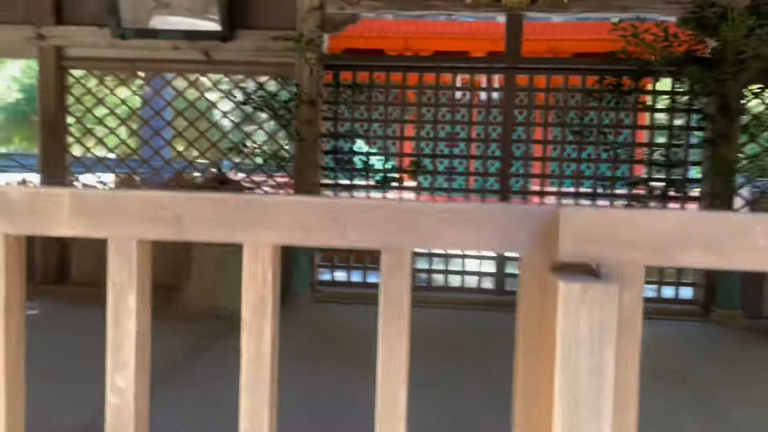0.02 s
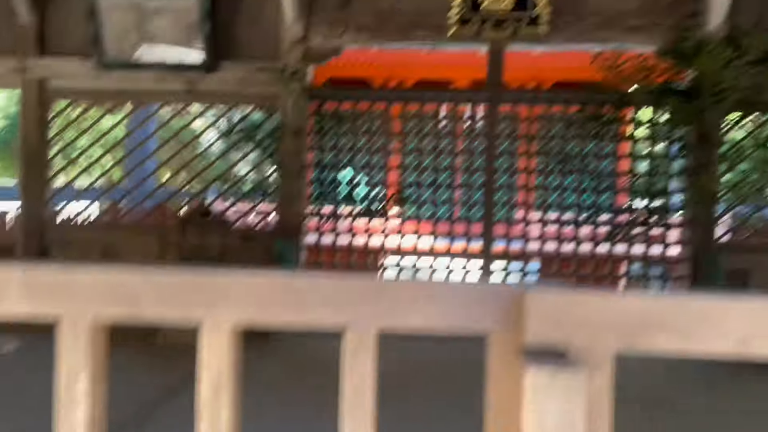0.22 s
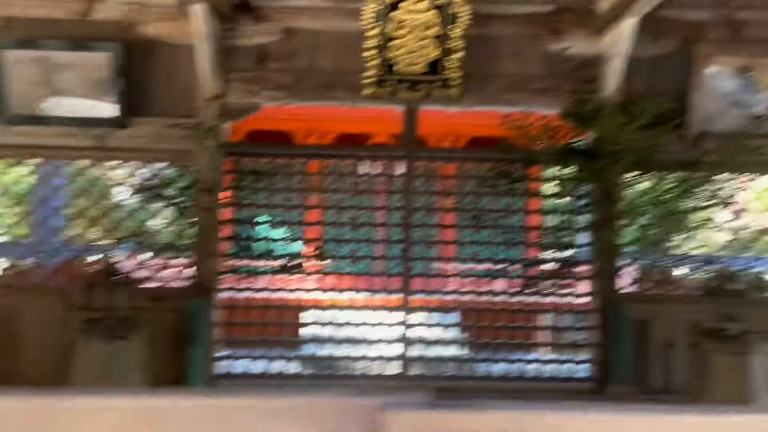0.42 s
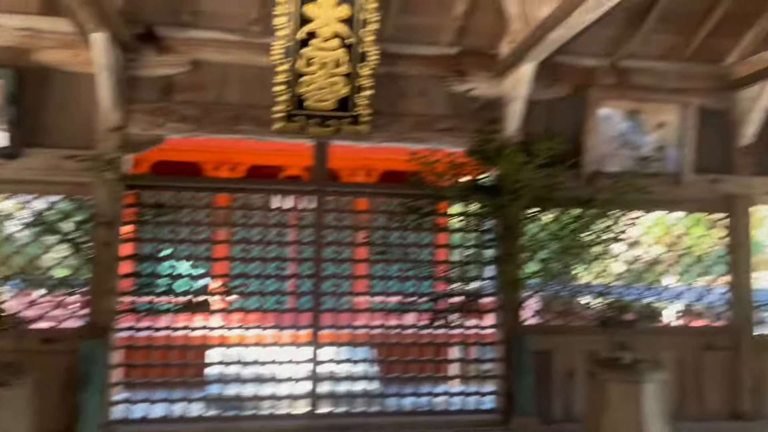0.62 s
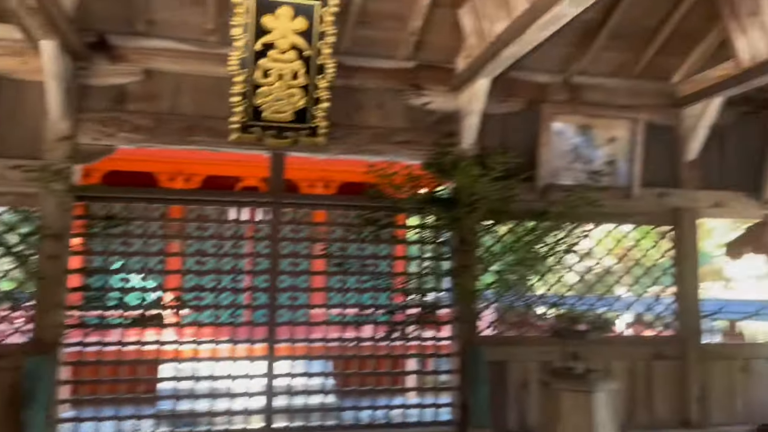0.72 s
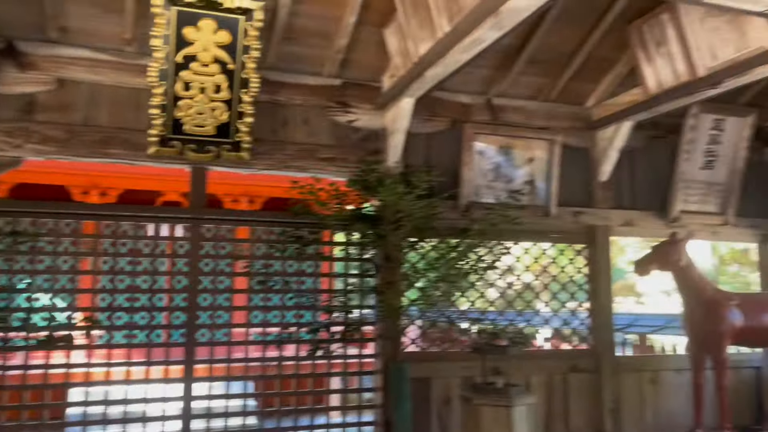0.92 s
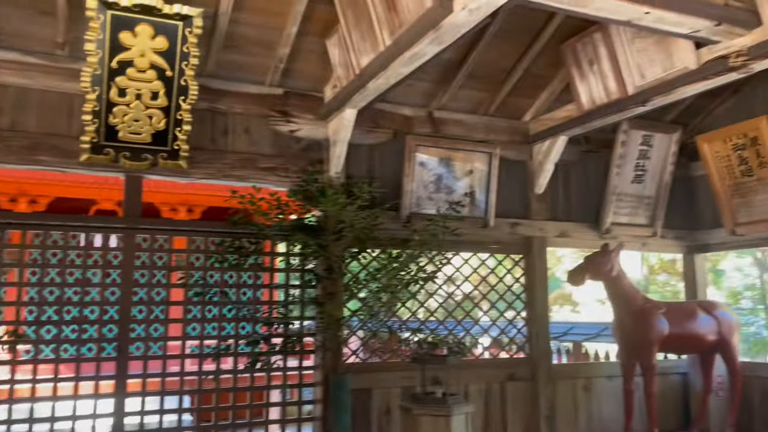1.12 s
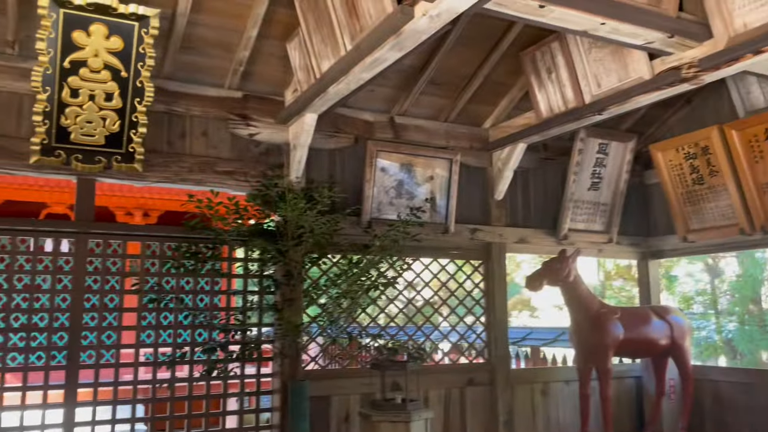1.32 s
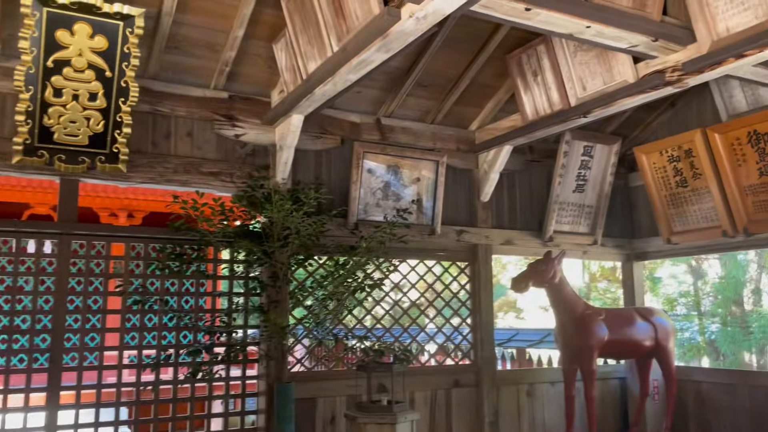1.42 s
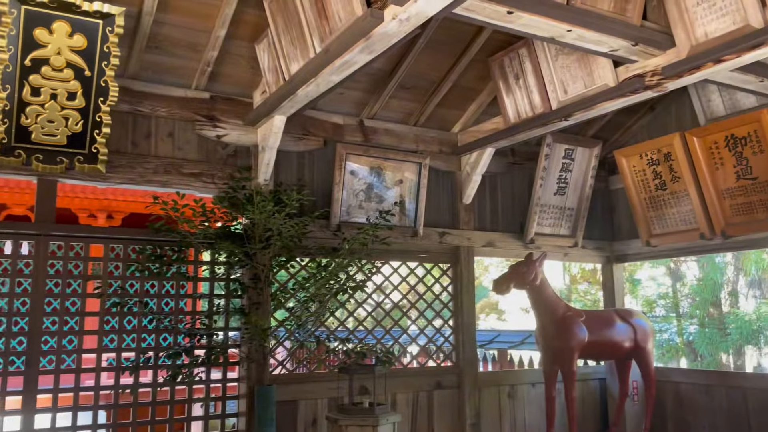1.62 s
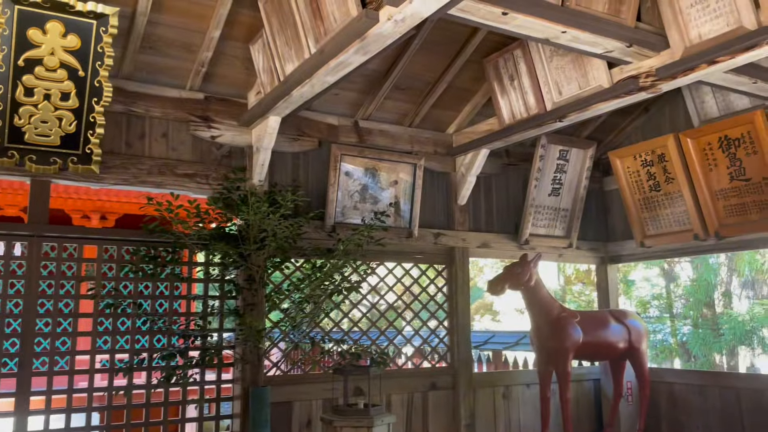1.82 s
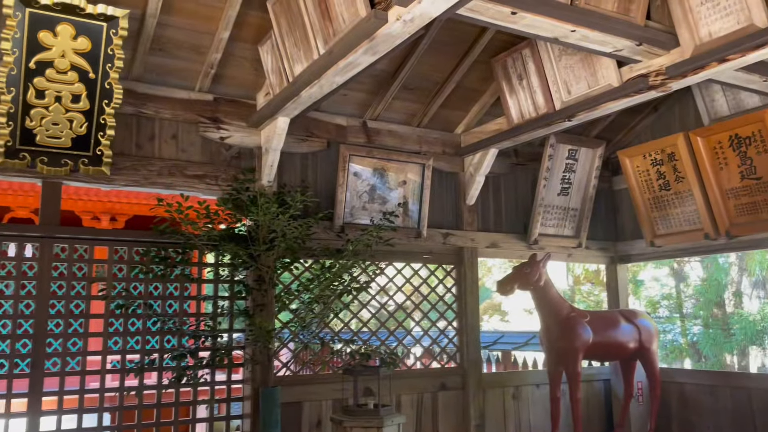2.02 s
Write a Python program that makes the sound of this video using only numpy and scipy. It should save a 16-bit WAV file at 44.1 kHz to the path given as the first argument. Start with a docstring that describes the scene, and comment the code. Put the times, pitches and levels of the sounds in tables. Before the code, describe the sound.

Coins fall into a wooden box, close to a phone in an open timber hall. After faint ticks, a hard knock lands at 0.23 s, lighter raps follow, then strong clacks at 0.61, 0.98 and 1.14 s, the 0.98 s one with a bright high clink. Small rattles and a brief roll die by 1.4 s. A short woody tail, soft hiss, distant traffic rumble and faint bird whistles remain until about 2 s.

```python
"""In an open timber hall, coins drop one after another into a wooden offering box, a step from a phone.
Each impact combines a noise crack, decaying modes of the boards and the ringing modes of a coin.
Between impacts, rolling coins drive board resonances with random ticks; faint high sines swell and fade.
A diffuse tail answers; distant traffic rumble and outdoor hiss are shaped noise, and a far bird's
whistles are wavering sines."""
import sys
import numpy as np
from scipy import signal
from scipy.fft import rfft, irfft
from scipy.io import wavfile
from scipy.ndimage import uniform_filter1d

SR = 44100
rng = np.random.default_rng(int(sys.argv[2]) if len(sys.argv) > 2 else 0)


def materialize(psi):
    """Save the field psi as 16-bit PCM at rate SR to the path in sys.argv[1].

    A 1-D psi becomes a single channel; in a 2-D psi each row is a channel.
    """
    bounded = np.clip(np.atleast_2d(psi).T, -1, 1)
    quanta = np.round(bounded * 32767).astype(np.int16)
    wavfile.write(sys.argv[1], SR, quanta)


N = 92610
t = np.arange(N) / SR


def undb(db):
    """Logarithmic level: amplitude gain is 10 to the power dB / 20."""
    return 10 ** (np.asarray(db) / 20)


def rms(x):
    """Effective value: the root of the mean power."""
    return np.sqrt(np.mean(x ** 2))


def unit(x):
    """Normalisation to an effective value of 1."""
    return x / np.sqrt(np.mean(x ** 2) + 1e-30)


def fade(time, t60):
    """Exponential decay: the level falls by 60 dB in t60 seconds."""
    return np.exp(-np.log(1000) * time / np.maximum(t60, .005))


def colour(x, table, turn=1):
    """Linear filtering by a (frequency [Hz], gain [dB]) response; a complex turn rotates the phase."""
    hz, db = np.array(table, float).T
    f = np.fft.rfftfreq(x.shape[-1], 1 / SR)
    gain = undb(np.interp(np.log(f + 1), np.log(hz), db))
    return irfft(rfft(x) * turn * gain, x.shape[-1])


def curve(table):
    """Linear interpolation of (time [s], value) rows at every sample."""
    return np.interp(t, *np.array(table).T)


def pair(mid, side):
    """Sum-and-difference stereo: left is mid + side, right is mid - side."""
    return np.array([mid + side, mid - side])


def walk(rate):
    """Low-pass random process: noise averaged twice over 1 / rate seconds, spread 1."""
    k = int(SR / rate)
    once = uniform_filter1d(rng.standard_normal(N), k, mode="wrap")
    return unit(uniform_filter1d(once, k, mode="wrap"))


def tail(u, t60s):
    """Frequency-dependent damping: each (frequency [Hz], t60 [s]) band of noise decays at its own pace."""
    out = 0
    hz = np.array(t60s)[:, 0]
    for k, (_, t60) in enumerate(t60s):
        passband = np.where(np.arange(len(hz)) == k, 0, -20)
        band = colour(rng.standard_normal(len(u)), list(zip(hz, passband)))
        out = out + band * fade(u, t60) / np.sqrt(t60)
    return out


# Impacts: (time [s], peak level before KNOCK_DB [dB], 9 x band level at BANDS_HZ [dB],
# middle coin mode before COIN_DB [dB], high coin group before COIN_DB [dB], coin ring t60 [s],
# board rise time [s], share of the boards' ring time [1], hall send [dB])
KNOCK_ROWS = [(0.122, -50, -1, -7, -13, -4, -4, -4, 8, -17, 0, -68, -80, 0.5, 0.0025, .9, 0.5),
              (0.137, -40, -6, -12, -14, -12.5, -20.5, -20, -15, -29.5, -36, -62, -73, 0.26, 0.0012, .9, 0.5),
              (0.224, -33, -20, -15, -12, -6, -8, -8, -12, -30, -40, -90, -90, .1, 0.004, .5, -6),
              (0.2346, -7, -19.5, -17.5, -19, -11, -8, -10.5, -6.5, -20.5, -12, -54.5, -14, 0.29, 0.0013, .6, 0.5),
              (0.2425, -14, -19.5, -15, -12, -6, -14, -14, -14, -26, -18, -70, -40, 0.29, 0.0006, .8, 0.5),
              (0.343, -25, -12, -15, -16, -5.5, -5, -16, -31, -47, -43, -86, -41, 0.9, 0.0025, .9, 0.5),
              (0.377, -23, -9.5, -22, -30, -25.5, -24, -21.5, -34, -45, -39, -80, -41, 0.15, 0.00067, .9, 0.5),
              (0.423, -31, -22, -42, -34, -15, -9.5, -15.5, -9, -29, -18, -66, -44, 0.12, 0.0024, .9, 0.5),
              (0.443, -29, -14, -32, -14.5, -13.5, -1.5, 2.5, -5, -25, -7, -68, -59, 0.33, 0.0025, .9, 0.5),
              (0.511, -40, -26.5, -22, -18, -8, 0, -10.5, -21, -32.5, -36, -85, -73, 0.14, 0.0013, .9, 0.5),
              (0.562, -30.5, -25.5, -24.5, -24, -5.5, -3.5, -8, -16, -45, -46, -86.5, -72, 0.38, 0.0039, .9, 0.5),
              (0.6145, -11.5, -34, -26, -24, -15, -21, -9.5, -12, -56, -38.5, -78, -61, 0.9, 0.00079, .6, -3),
              (0.732, -26, -21, -26, -24, -3, -8, -2, -12, -37.5, -22, -62, -62, 0.14, 0.0011, .7, 0.5),
              (0.743, -20, -26, -20, -27.5, -17.5, -21, -8, -8.5, -35, -23, -65, -54, 0.41, 0.00069, .7, 0.5),
              (0.808, -29.5, -32, -20.5, -24, -21.5, -19.5, -17, -15.5, -45, -27.5, -78, -64, 0.35, 0.0022, .9, 0.5),
              (0.852, -39.5, -16, -16.5, -5.5, -15, -7.5, -7, -3, -46.5, -29.5, -90, -59, 0.3, 0.0015, .9, 0.5),
              (0.9818, -8, -23, -19, -28, -21, -23, -2.5, -18, -31, -13, -25, -22, 0.43, 0.0012, .7, -3),
              (1.032, -28, -16, -14, -34, -15.5, -19, -8, -16, -23.5, -14, -22, -17.5, 0.11, 0.004, .9, 0.5),
              (1.138, -15, -24, -18, -27, -16, -16, -9.5, -17.5, -31, -15.5, -40, -54, 0.49, 0.00071, .8, -2),
              (1.174, -31, -21.5, -11, -19.5, -10.5, -15.5, -3.5, -23.5, -30, -5, -39, -35, 0.4, 0.0015, .9, 0.5),
              (1.2, -35.5, -20, -15.5, -28, -5, -20, -12, -16, -42, -20, -49, -35.5, 0.78, 0.0015, .9, 0.5),
              (1.245, -35, -18.5, -10.5, -15, -7, -19, 7.5, -15.5, -24, 0, -42, -51, 0.9, 0.0027, .9, 0.5),
              (1.293, -30, -14.5, -19, -31, -13.5, -22, -10.5, -13.5, -30.5, -11, -55, -57, 0.78, 0.0025, .9, 0.5),
              (1.332, -40.5, -12.5, -8, -15, -5.5, -16, -9, -13.5, -15, -9.5, -76.5, -67, 0.26, 0.00098, .9, 0.5),
              (1.374, -43, 2, -14, -34, -5, -20.5, -22, -7, -42, -21, -95, -95, 0.1, 0.0017, .9, 0.5),
              (1.532, -53.5, 2, -9, -23, -14.5, -4.5, -4.5, -17.5, -20.5, -7, -99, -99, 0.1, 0.0008, .3, -6)]
# Band centres of an impact's colour: (frequency [Hz])
BANDS_HZ = [240, 410, 630, 1100, 1900, 3200, 5100, 7400, 10300]
# Widths of those bands: (bandwidth [Hz])
BAND_WIDTHS_HZ = [160, 170, 300, 700, 1000, 1500, 2500, 2000, 4000]
# Modes of the box's boards: (frequency [Hz], level [dB], t60 [s])
BOARD_MODES = [(243.6, 0, 0.093), (412, -10, 0.13), (745, -3, 0.034), (958, 1.5, 0.15), (1200, -1, 0.12),
               (1296, 2.5, 0.13), (1703, 4.5, 0.077), (1786, -1, 0.11), (2085, 13.5, 0.03),
               (2750, -2.5, 0.073), (2904, 7.5, 0.065), (3304, 6.5, 0.02), (3710, 4.5, 0.062),
               (3990, 8.5, 0.025), (4500, 9, 0.046)]
# Noise of the crack: (frequency [Hz], t60 [s])
CRACK_DECAY = [(1000, 0.049), (8000, 0.035)]
# Two groups of coin modes, close ones beating: (frequency [Hz], level [dB], share of ring t60 [1])
COIN_MODES = [
    [(11655, 0, .6)],
    [(12977, 0, 1.1), (12996, -5, .7), (13040, -6, .25)],
]
# A coin falls flat and its ring is choked: (time [s], t60 of the added damping [s])
COIN_RESTS = [(.6, 0.15), (.73, .15), (1.137, .12), (1.339, 0.1), (1.45, .05)]
WOOD_SCATTER_DB, WOOD_DETUNE = 2.5, .008  # spread of mode levels, relative spread of mode frequencies
CONTACT_S, EARLY_S = 0.0034, 0.00091  # the coin's ring builds up; sound starts ahead of the listed time
CRACK_DB, KNOCK_DB, COIN_DB = 7.5, -5.5, -7
COIN_FLUTTER_DB, COIN_FLUTTERS_PER_S = 2.2, 80  # the coins' ring flutters in level
HALL_CONTRAST = 0.82  # share of a knock's colour that survives in its tail


def board_blow(u, rise, damp):
    """Modal superposition: the blow excites damped board modes and a short broadband crack."""
    hz, db, t60 = np.array(BOARD_MODES).T[:, :, None]
    level, detune, phase = rng.standard_normal((3, len(BOARD_MODES), 1))
    mode_hz = hz * (1 + WOOD_DETUNE * detune)
    mode_gain = undb(db + WOOD_SCATTER_DB * level) * fade(u, t60 * damp)
    modes = (mode_gain * np.sin(2 * np.pi * mode_hz * u + 2 * phase)).sum(0)
    swell = (1 - np.exp(-u / max(rise, 2e-4))) ** 2
    crack = tail(u, [(f, d * damp) for f, d in CRACK_DECAY])
    return unit(swell * modes) + undb(CRACK_DB) * unit(swell * crack)


def coin_ring(v, s, group_db, ring_t60):
    """Free vibration of a lightly damped plate: modes decay and beat until contact adds damping."""
    ring = 0
    for g, group in zip(group_db, COIN_MODES):
        for f, d, share in group:
            ring = ring + undb(g + d + COIN_DB) * fade(v, ring_t60 * share) * np.sin(2 * np.pi * f * v)
    for rest, choke in COIN_RESTS:
        time_choked = np.maximum(v + s - rest, 0) * (rest > s + CONTACT_S)
        ring = ring * fade(time_choked, choke)
    return ring * np.minimum(v / CONTACT_S, 1) ** 2


def knocks():
    """Impact excitation: each blow sounds boards and coin; a bare coloured impulse goes to the hall."""
    wood, blows, coins = np.zeros((3, N))
    lead, size = 512, 8192  # samples ahead of the blow, samples in all
    u = np.arange(size - lead) / SR
    impulse = 1. * (np.arange(size) == lead)
    for s, peak_db, *row in KNOCK_ROWS:
        band_db, group_db = row[:9], row[9:11]
        ring_t60, rise, damp, send_db = row[11:]
        # band level to level per Hz, with falling ends
        per_hz = np.array(band_db) - 10 * np.log10(BAND_WIDTHS_HZ)
        shape = [(90, per_hz[0] - 24), *zip(BANDS_HZ, per_hz),
                 (12600, per_hz[-1] - 6), (14000, per_hz[-1] - 16)]
        x = colour(np.r_[np.zeros(lead), board_blow(u, rise, damp)], shape)
        short_time_peak = np.sqrt(np.max(uniform_filter1d(x ** 2, 128)))
        x *= undb(peak_db + KNOCK_DB) / short_time_peak
        i = int((s - EARLY_S) * SR) - lead
        wood[i:i + size] += x
        soft_shape = [(f, HALL_CONTRAST * d) for f, d in shape]
        blows[i:i + size] += undb(send_db) * unit(colour(impulse, soft_shape)) * rms(x)
        coins[i + lead:] += coin_ring(t[:N - i - lead], s, group_db, ring_t60)
    return wood, blows, coins * undb(COIN_FLUTTER_DB * walk(COIN_FLUTTERS_PER_S))


# Board resonances shaken while a coin rolls:
# (start [s], length [s], level [dB], centre frequency [Hz], bandwidth [Hz])
ROLL_ROWS = [(0.35, .1, -42, 255, 16), (.345, 0.04, -42, 183, 22), (.435, .05, -41, 183, 20),
             (0.383, .1, -50, 2180, 2000), (1.145, 0.19, -53, 930, 50), (1.145, .19, -55, 1690, 50),
             (1.15, .18, -53, 2980, 250), (1.16, .18, -54, 2900, 2500)]
ROLL_TICKS_PER_S = 740


def rolls():
    """Resonance under random impulses: uneven ticks of a rolling coin drive narrow board bands."""
    out = np.zeros(N)
    for s, length, db, hz, width_hz in ROLL_ROWS:
        ticks = (rng.random(N) < ROLL_TICKS_PER_S / SR) * rng.standard_normal(N)
        env = np.clip(np.minimum((t - s) / 0.0022, (s + length - t) / 0.011), 0, 1)
        board = signal.iirpeak(hz, hz / width_hz, fs=SR)
        shaken = signal.lfilter(*board, signal.lfilter(*board, ticks))
        out += undb(db) * unit(env * shaken) * rms(env)
    return out


# Faint high tones near 7.7 kHz that swell and fade:
# (start [s], length [s], frequency [Hz], level before flutter [dB])
HIGH_TONE_ROWS = [(.24, .33, 7640, -58), (.27, .24, 7785, -64), (.64, .09, 7775, -59),
                  (.985, .28, 7640, -62), (1.03, .14, 7765, -60), (1.165, .1, 7790, -63),
                  (1.265, .15, 7800, -58)]
TONE_FLUTTER_DB, TONE_FLUTTERS_PER_S = 3.5, 53


def high_tones():
    """Amplitude modulation: faint high tones near 7.7 kHz swell and fade, unsteady in level."""
    out = 0
    for s, length, hz, db in HIGH_TONE_ROWS:
        env = np.sqrt(np.sin(np.pi * np.clip((t - s) / length, 0, 1)).clip(0))
        flutter = undb(db + TONE_FLUTTER_DB * walk(TONE_FLUTTERS_PER_S))
        out = out + env * flutter * np.sin(2 * np.pi * hz * t)
    return out


# Reverberation of box and hall: (frequency [Hz], t60 [s])
HALL_DECAY = [(200, 0.43), (700, 0.71), (2500, 0.32), (7000, 0.14), (13000, 0.061)]
# Width of the reverberation: (frequency [Hz], side minus mid [dB])
HALL_WIDTH = [(200, -14.5), (370, -2.5), (680, -1), (1250, -0.5), (2290, -7), (4000, -8), (5600, -7),
              (7500, 13), (9500, -5), (13000, -2.5)]
HALL_DB, HALL_GAP_S = -6.5, 0.0065  # the tail rises from half this gap to one and a half
HALL_GRAIN_DB, HALL_GRAINS_PER_S = 1.5, 370


def hall(x):
    """Diffuse reverberation: convolution with decaying noise from box and hall, shortest in the treble."""
    u = t[:SR // 2]
    grain = undb(HALL_GRAIN_DB * walk(HALL_GRAINS_PER_S))[:len(u)]  # echoes arrive in clumps
    onset = np.clip(u / HALL_GAP_S - .5, 0, 1)
    mid, side = (signal.fftconvolve(x, unit(tail(u, HALL_DECAY) * grain * onset))[:N] for _ in range(2))
    return undb(HALL_DB) / np.sqrt(len(u)) * pair(mid, colour(side, HALL_WIDTH))


# Far whistles of a bird: (start [s], length [s], mean frequency [Hz], level before wavering [dB])
BIRD_ROWS = [(-0.02, 0.047, 3800, -58), (0.81, 0.22, 4750, -64.5), (1.568, 0.11, 5250, -73.5),
             (1.81, 0.16, 5750, -77.5), (1.865, 0.096, 4720, -73), (1.908, 0.21, 3750, -70.5)]


def bird():
    """Frequency and amplitude modulation: thin far whistles that waver a little in pitch and level."""
    out = 0
    for s, length, hz, db in BIRD_ROWS:
        env = np.sin(np.pi * np.clip((t - s) / length, 0, 1)) * undb(db + 4 * walk(60))
        phase = 2 * np.pi * np.cumsum(hz * (1 + .01 * walk(40))) / SR
        out = out + env * np.sin(phase)
    return out


AIR_PATCH_DB, AIR_PATCHES_PER_S = 0.5, 8


def patchy(x):
    """Independent band fluctuation: each band of the hiss wanders in level on its own."""
    edges = [400, 1000, 2200, 4200, 5600]  # Hz
    lows = [0 * x, *(colour(x, [(hz, 0), (hz * 1.2, -40)]) for hz in edges), x]
    return sum((b - a) * undb(AIR_PATCH_DB * walk(AIR_PATCHES_PER_S)) for a, b in zip(lows, lows[1:]))


# Spectrum of rumble and hiss, before normalisation: (frequency [Hz], density [dB per Hz])
AIR_SPECTRUM = [(22, -33.5), (41, -14), (68, -1.5), (117, -14.5), (158, -15), (181, -24.5), (429, -35),
                (1530, -50.5), (3440, -51), (3730, -48.5), (5600, -52), (6600, -62.5), (7940, -87),
                (8610, -63.5), (14000, -88.5)]
# Width of the outdoor sound: (frequency [Hz], side minus mid [dB])
AIR_WIDTH = [(60, -14), (110, -11.5), (200, -7.5), (370, -0.5), (680, 3), (1250, 2), (2290, -3.5),
             (4210, -7.5), (7720, 3.5), (14200, -7)]
# Courses of the rumble, the hiss and the highest hiss, each taken relative to its mean
# over the last half second: (time [s], level [dB])
RUMBLE_COURSE = [(0.0, -45), (0.03, -48), (0.3, -40), (0.37, -46), (0.4, -45), (0.53, -54), (0.58, -40.5),
                 (0.71, -32.5), (0.74, -41.5), (1.12, -43.5), (1.15, -56), (1.19, -41), (1.73, -43),
                 (1.75, -38.5), (1.83, -38.5), (1.88, -46.5), (2.06, -39.5), (2.1, -48)]
HISS_COURSE = [(0.0, -61), (0.58, -62), (1.02, -63), (1.16, -63), (1.38, -64), (2.1, -64)]
TOP_COURSE = [(0.0, -74.5), (0.46, -69), (1.02, -95), (1.17, -54.5), (1.41, -88.5), (2.1, -87.5)]
AIR_DB = -41.5


def change(table):
    """Relative level: gain of a course against its mean over the last half second."""
    level_db = curve(table)
    return undb(level_db - level_db[-SR // 2:].mean())


def air():
    """Spectrally shaped random noise: swelling traffic rumble under a wide outdoor hiss."""
    mid = unit(colour(rng.standard_normal(N), AIR_SPECTRUM))
    side = colour(unit(colour(rng.standard_normal(N), AIR_SPECTRUM)), AIR_WIDTH)
    both = pair(mid, side) * undb(AIR_DB)
    low = colour(both, [(110, 0), (200, -40)])
    top = colour(both, [(6000, -40), (7200, 0)])
    hiss = patchy(both - low - top)
    return low * change(RUMBLE_COURSE) + hiss * change(HISS_COURSE) + top * change(TOP_COURSE)


# Phase-rotated part of the near sound: (frequency [Hz], side minus mid [dB])
KNOCK_WIDTH = [(60, -11.5), (200, -21), (370, -11.5), (680, -3), (1250, -4.5), (2290, -10.5), (4000, -9.5),
               (5600, -9.5), (7500, 13), (9500, -12), (13000, 3)]
# Tilt between the two ports: (frequency [Hz], left minus right [dB])
BALANCE = [(60, 1), (110, -7.5), (200, -4.5), (370, 1.5), (680, 2), (1250, 0), (2290, 2.5), (4210, 3.5),
           (7720, 2), (14200, -1.5)]
HALL_COIN_DB, HALL_ROLL_DB = -4, -6  # sends to the hall


def scene():
    """Interchannel phase and level difference: two ports hear the box, each with its own tilt."""
    wood, blows, coins = knocks()
    roll = rolls()
    near = wood + coins + roll + high_tones()
    # a quarter-cycle rotation, opposite in sign at the two ports
    lag = np.array([[1], [-1]]) * colour(near, KNOCK_WIDTH, turn=1j)
    box = near + lag + hall(blows + undb(HALL_ROLL_DB) * roll + undb(HALL_COIN_DB) * coins)
    left = colour(box[0], [(f, db / 2) for f, db in BALANCE])
    right = colour(box[1], [(f, -db / 2) for f, db in BALANCE])
    return np.array([left, right]) + air() + bird()


TOP_HZ = 13500


def record(dry):
    """Band limitation: the phone cuts the top with a steep low-pass."""
    return signal.sosfilt(signal.butter(20, TOP_HZ, fs=SR, output="sos"), dry)


dry = scene()
out = record(dry)
materialize(out)
```